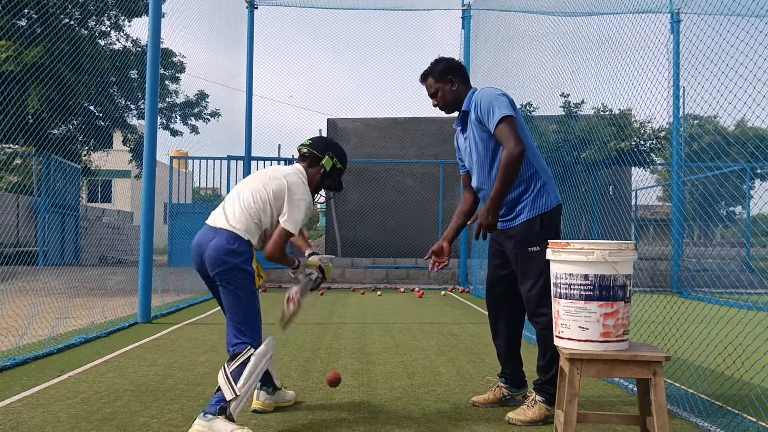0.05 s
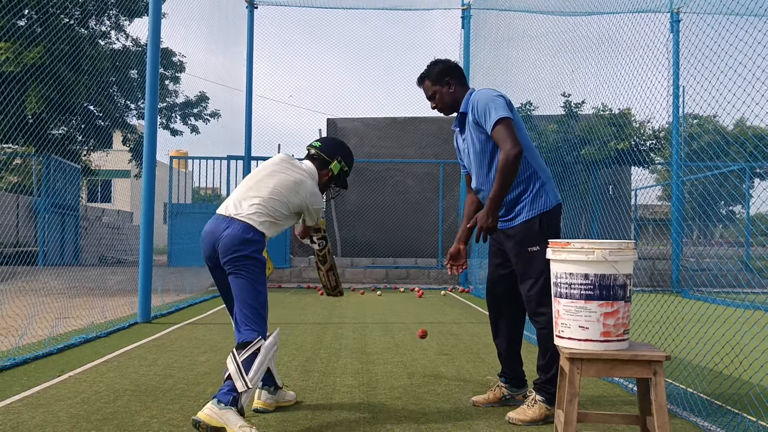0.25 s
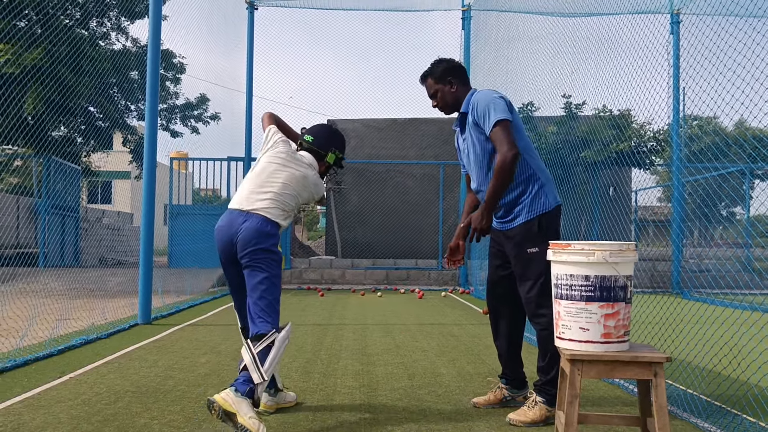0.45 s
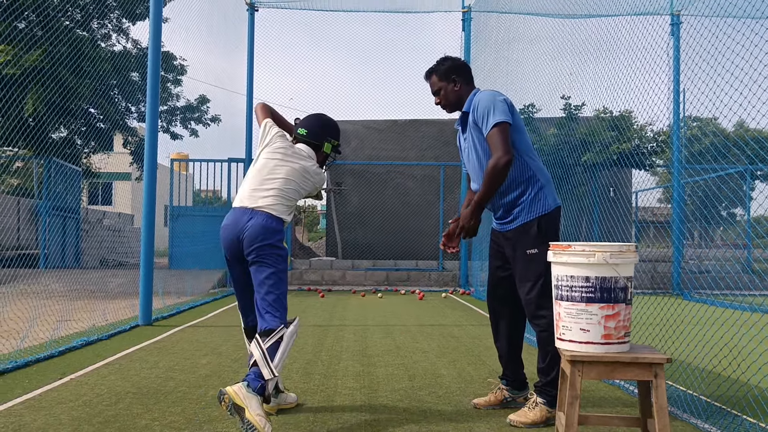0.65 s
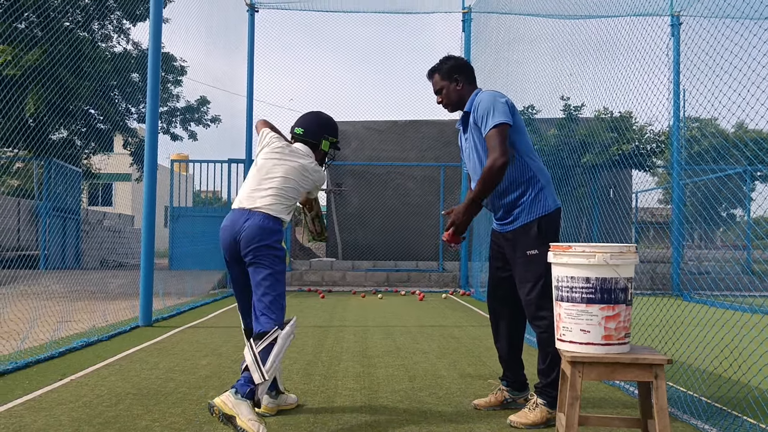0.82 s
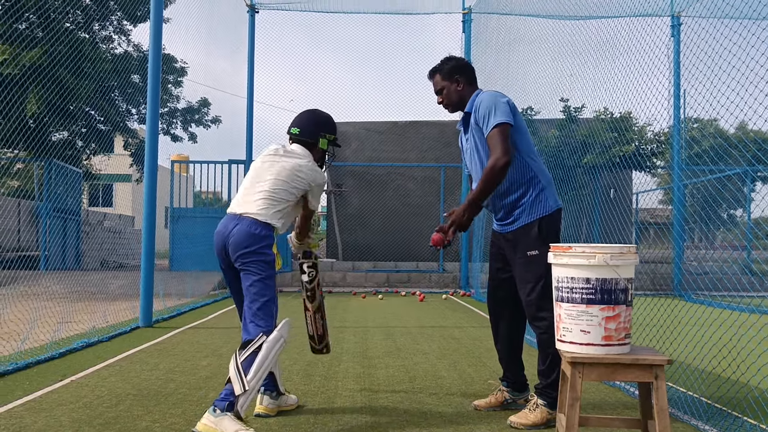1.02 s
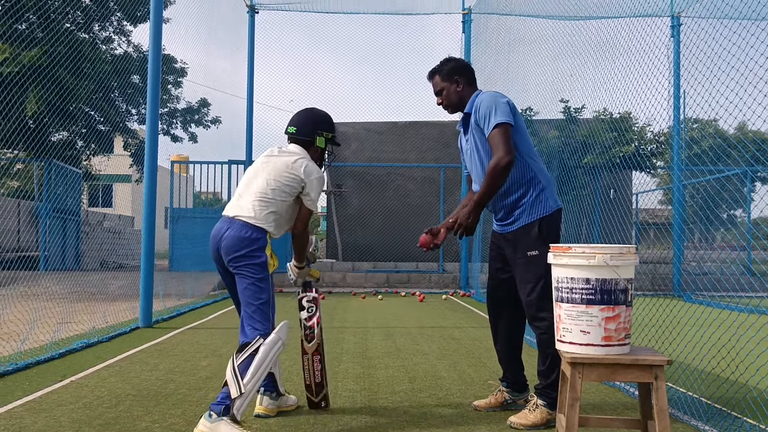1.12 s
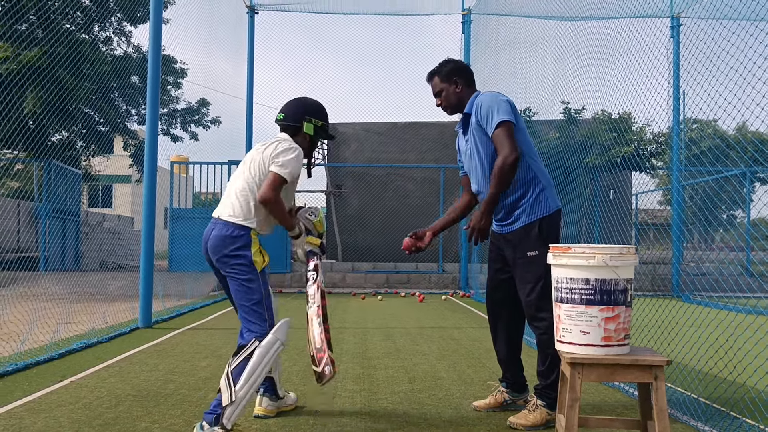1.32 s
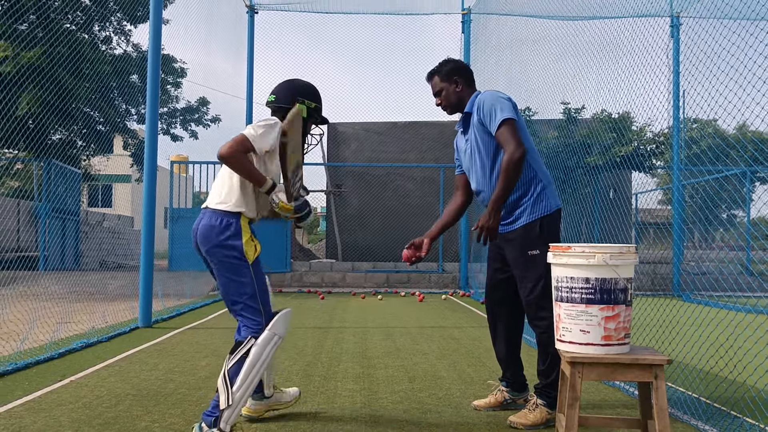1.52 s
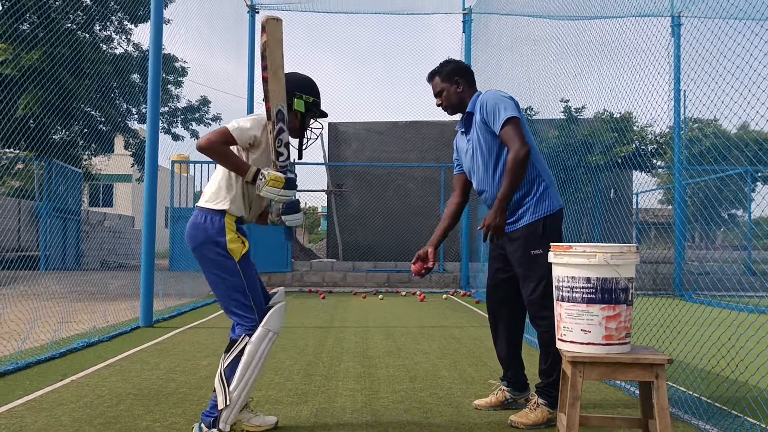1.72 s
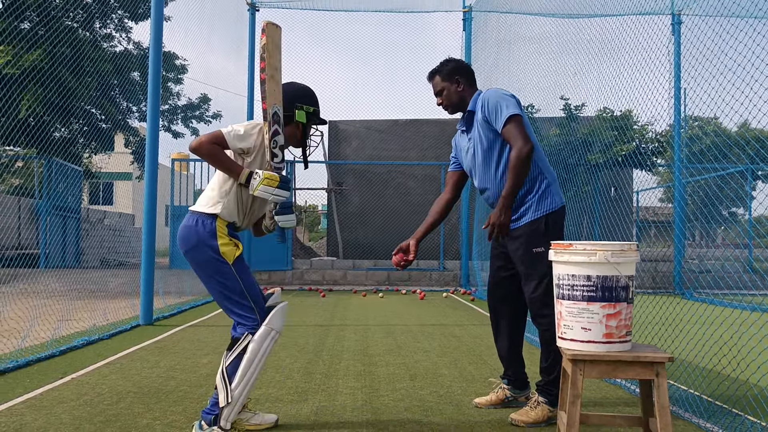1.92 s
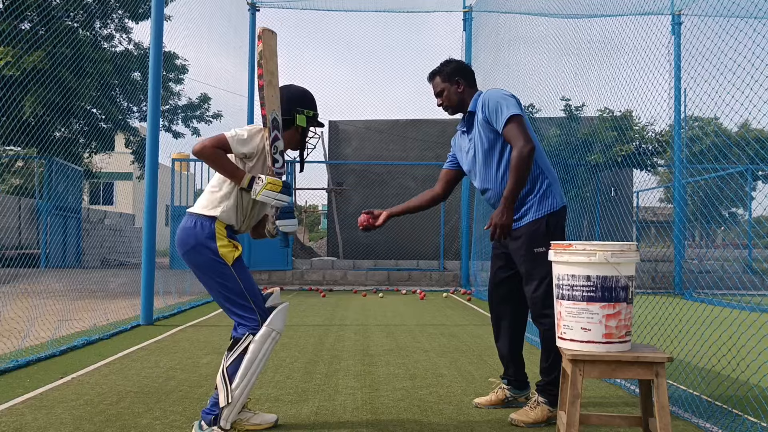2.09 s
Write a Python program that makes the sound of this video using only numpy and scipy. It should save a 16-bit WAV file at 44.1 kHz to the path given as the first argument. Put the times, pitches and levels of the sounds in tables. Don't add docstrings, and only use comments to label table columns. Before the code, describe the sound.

A cricket bat cracks hard against a ball once, echoing off walls around an outdoor net

```python
import sys
import numpy as np
from scipy import signal
from scipy.io import wavfile

SR = 44100
rng = np.random.default_rng(int(sys.argv[2]) if len(sys.argv) > 2 else 0)


def store_pcm(level_fs):
    pcm = np.round(np.clip(level_fs, -1, 1) * 32767).astype(np.int16)
    wavfile.write(sys.argv[1], SR, np.atleast_2d(pcm).T)


def how_loud(loudness_db):
    steps = np.asarray(loudness_db, float) / 20
    return 10 ** steps


N = 94815

# (time [s], peak level [dB], brightness [dB], ground lag [s], left lead [s])
BLOW = (.2131, -1, 1, .0025, 0)
SLAP = (.2476, -2.5, -4, .0022, .00018)
# (time [s], peak level [dB], pan [dB])
FAR_WALLS = [(0.28, -23, 1.0), (0.289, -22, 0.5), (0.303, -29, 0.5), (0.314, -34, 1.5), (0.325, -34, 1.0),
             (0.34, -35, 0.5), (0.361, -38, 1.0), (0.374, -31, -0.5), (0.385, -36, 0.0), (0.396, -34, 1.5),
             (0.409, -29, 2.0), (0.43, -41, 2.5), (0.451, -46, 1.5), (0.465, -51, -1.5), (0.483, -52, -1.0),
             (0.506, -48, -4.0), (0.541, -53, -2.5)]
# (frequency [Hz], level [dB], t60 [s])
BLADE_MODES = [(242.6, -6.5, 0.012), (410, -7.5, 0.0096), (730, -2, 0.0105), (900, -6.5, 0.011)]
FACE_MODES = [(2280, -19, .013), (3200, -14, .005), (4100, -17, .005), (5200, -23, .007), (5800, -27, .007),
              (6500, -30, .007), (7400, -33, .007), (13000, -24, .006)]
WALL_MODES = [(380, -9, .011), (775, -1, .015), (950, -9, .01), (1410, -6, .01)]
YARD_MODES = [(316.2, -16, 0.013), (561.6, 4.5, 0.0085), (760, 6, 0.011), (950, -9, 0.045),
              (1400, -16, .045)]
# (time [s], level [dB])
SCATTER = [(.217, -60), (.222, -49.5), (.245, -44), (.254, -32), (.3, -42), (.35, -48.5), (.405, -46.5),
           (.47, -58), (.55, -68), (.6, -130)]
# (time [s], rise [s], t60 [s], level [dB], pan [dB])
BOUNCE = [
    (.161, .002, .022, -47, 0),
    (.163, .004, .09, -62, 0),
]
NET = [
    (.208, .006, .06, -48, 1),
    (.2345, .001, .02, -50, 3),
    (.247, .003, .08, -49, 1),
    (.258, .03, .14, -50, 1),
]
SHOE = [(.08, 0.0037, 0.42, -77.5, 11.5), (.627, 0.0031, 0.39, -66.5, 6.5), (.69, 0.031, .3, -71.5, 10.5),
        (.89, 0.099, .2, -84, 12.5), (1.53, 0.032, 0.3, -83, 5.5), (1.3, 0.018, 0.13, -78.5, 7)]
SLEEVE = [
    (1.84, 0.085, 0.3, -67, 1),
    (2.02, 0.022, 0.21, -73.5, 0),
]
PAD = [
    (1.207, 0.0061, 0.074, -35, 1),
    (1.221, 0.0015, 0.15, -53, 1),
]
# (frequency [Hz], width [Hz], level [dB])
BOUNCE_TONE = [(300, 200, -14), (990, 150, 0), (2290, 600, 5), (3500, 900, -6), (4520, 300, 1),
               (5150, 300, -2), (12000, 4000, -26)]
NET_TONE = [(1900, 710, -1), (3460, 1100, 1), (4495, 2000, 0), (5580, 600, -7), (6700, 1400, -12),
            (12800, 4500, -7)]
SHOE_TONE = [(2800, 1500, -13), (4500, 500, -9), (5400, 600, -6), (6900, 1000, 4), (12500, 3500, -11)]
PAD_TONE = [(157, 97, -27), (1580, 79, -20), (2470, 270, -12.5), (3430, 480, 0.5), (4360, 1800, -7.5),
            (5340, 2300, -5), (6900, 1300, -11), (12500, 6000, -8)]
# (time [s], level [dB])
HORN_LEVEL = [(0, -72), (.14, -68.5), (.36, -71.5), (.4, -96), (1.1, -90), (1.15, -61), (1.3, -63),
              (1.38, -58), (1.44, -67), (1.53, -63), (1.65, -75), (1.78, -60), (1.93, -57), (2.06, -66.5),
              (2.15, -91)]
# (multiple of fundamental [-], level [dB], share of the level swing [-])
HORN_PARTIALS = [(9, -3, 1.7), (10, 1.5, 1), (11, -5, 1.5), (15, -26, 1.2)]
# (time [s], length [s], pitch [Hz], level [dB], waver share [-])
HOOTS = [(.79, .07, 670, -62, .015), (.87, .09, 685, -71, .01), (1.14, .12, 760, -61, .012),
         (1.22, .15, 800, -70, .015), (.96, .09, 1090, -73, .015), (.99, .09, 1280, -74, .02),
         (1.3, .07, 2650, -68, .008), (1.33, .1, 1330, -76, .02), (1.91, .05, 625, -71, .01)]
# (time [s], length [s], start pitch [Hz], end pitch [Hz], level [dB])
GLIDES = [(.07, .04, 7000, 6200, -80), (.085, .1, 5500, 5300, -84), (.41, .11, 1430, 1330, -69),
          (.44, .12, 960, 830, -62), (.445, .045, 3120, 2850, -74), (.53, .08, 3530, 3530, -79),
          (.675, .15, 5750, 5250, -79), (.69, .09, 4500, 4450, -81), (.79, .065, 4420, 4380, -76),
          (.885, .15, 3400, 3240, -68.5), (.93, .09, 5050, 5000, -87), (1.3, .06, 6500, 6500, -80),
          (1.27, .1, 5400, 5250, -78)]
# (time [s], pulse rate [Hz], level [dB], rattle 0-1 [-], upper throat share 0-1 [-])
CAW = [(1.66, 350, -110, 0.5, .1), (1.72, 345, -60, 0, 0.3), (1.745, 335, -49, 1, 0.36),
       (1.8, 315, -47, 0.34, 0), (1.85, 310, -45.5, .8, .8), (1.93, 303, -45.5, 1, 1),
       (1.98, 300, -52.5, 0.6, 0.76), (2.01, 295, -60.5, .4, 0.7), (2.14, 295, -75, .4, .9)]
# (frequency [Hz], width [Hz], level [dB])
THROAT_LOW = [(1343, 110, 0), (1409, 200, -1.5), (1830, 100, -4.5)]
THROAT_HIGH = [(1598, 114, 5), (2400, 110, -11), (2780, 210, -14.5)]
# (frequency [Hz], density [dB per Hz])
TOWN_SPECTRUM = [(20, -32.5), (90, -0.5), (300, -7), (900, -18.5), (3300, -15), (4300, -27.5),
                 (6800, -32.5), (8000, -48.5)]
# (frequency [Hz], likeness [-])
LIKENESS = [(60, 0.96), (300, .85), (1000, .4), (4000, 0.13), (12000, .6)]

CONTACT_HZ, SLAP_CUT_HZ = 1250, 2200
THIN_HZ, YARD_THIN_HZ = 210, 443
TURF_DB, TURF_FACE_DB = -5.5, -2
PORT_SPREAD = 0.12
FACE_LAG_S, FAR_LAG_S = 0.0002, 0.0012
FAR_DB = 1
SCATTER_PER_S, SCATTER_SPREAD_DB = 2000, 2.0
HORN_HZ = 353.5
TOWN_DB, HUM_DB, HUM_HZ, HUM_WIDTH_HZ = -66.5, -72, 91, 30
HISS_DB = -96
RIGHT_PORT_HZ, CUTOFF_HZ = 9100, 16900
DIP_HZ, DIP_WIDTH_HZ, DIP_SHARE = 8600, 2000, 0.6


def rms_one(x):
    return x / np.sqrt(np.mean(x ** 2) + 1e-20)


def butter(x, order, hz, kind="low"):
    return signal.sosfilt(signal.butter(order, hz, kind, fs=SR, output="sos"), x)


def in_time(rows):
    s, *columns = np.transpose(rows)
    return [np.interp(np.arange(N) / SR, s, c) for c in columns]


def at_hz(points, hz):
    table_hz, value = np.transpose(points)
    return np.interp(np.log(hz), np.log(table_hz), value)


def pan(db):
    return how_loud(np.array([[db / 2], [-db / 2]]))


def drift(rate_hz):
    r = np.exp(-2 * np.pi * rate_hz * 40 / SR)
    white = rng.standard_normal(N // 40 + 2002)
    slow = signal.lfilter([1], [1, -2 * r, r * r], white)[2000:]
    return np.interp(np.arange(N) / 40, np.arange(len(slow)), rms_one(slow))


def ring(clicks, modes):
    out = 0
    for hz, db, t60_s in modes:
        r = how_loud(-60 / (t60_s * SR))
        w = 2 * np.pi * hz / SR
        mode = signal.lfilter([0, np.sin(w)], [1, -2 * r * np.cos(w), r * r], clicks + 1e-18)
        out = out + how_loud(db) * mode
    return out


def resonance(x, hz, width_hz):
    r = np.exp(-np.pi * width_hz / SR)
    b = np.array([1, 0, -1]) * (1 - r * r) / 2
    return signal.lfilter(b, [1, -2 * r * np.cos(2 * np.pi * hz / SR), r * r], x)


def resonance_twice(x, hz, width_hz):
    return resonance(resonance(x, hz, width_hz), hz, width_hz)


def bat():
    near = strike(BLOW, 1, BLADE_MODES, CONTACT_HZ) + strike(SLAP, -1, WALL_MODES, SLAP_CUT_HZ)
    return butter(near + far_walls() + yard_scatter(), 3, THIN_HZ, "high")


def strike(blow, sign, modes, cut_hz):
    s, db, bright_db, lag_s, lead_s = blow
    direct, turf = np.zeros((2, 2, N))
    for side, at in enumerate((s, s + lead_s)):
        direct[side, int(at * SR)] = sign * how_loud(db)
        turf[side, int((at + lag_s) * SR)] = sign * how_loud(db + TURF_DB)
    blade = how_loud(-4.5) * ring(direct + turf, modes)
    unlike = [np.convolve(v, np.r_[1, PORT_SPREAD * rng.standard_normal(12)])[:N] for v in direct]
    face = ring(np.array(unlike), FACE_MODES) + how_loud(TURF_FACE_DB) * ring(turf, FACE_MODES[:1])
    face = butter(how_loud(bright_db) * face, 2, [1900, 6000], "band")
    face = np.roll(face, int(FACE_LAG_S * SR), axis=1)
    return butter(blade, 4, cut_hz) + face


def far_walls():
    clicks = np.zeros((2, N))
    for s, db, pan_db in FAR_WALLS:
        clicks[:, int((s + FAR_LAG_S) * SR)] = -how_loud(db + FAR_DB) * pan(pan_db)[:, 0]
    return butter(ring(clicks, WALL_MODES[:3]), 2, [280, 1200], "band")


def yard_scatter():
    level_db, = in_time(SCATTER)
    hits = (rng.random(N) < SCATTER_PER_S / SR) * rng.standard_normal(N)
    hits = hits * how_loud(SCATTER_SPREAD_DB * rng.exponential(1, N).clip(0, 4))
    hits = hits * how_loud(2.2 * rng.standard_normal(N) * [[1], [-1]])
    colored = rms_one(butter(ring(hits, YARD_MODES), 2, [YARD_THIN_HZ, 1700], "band"))
    begun = np.arange(N) > SCATTER[0][0] * SR
    return how_loud(level_db) * begun * colored


def scuffs(events, tone, patchy_db):
    t, envelope, rub = np.arange(N) / SR, 0, 0
    for s, rise_s, t60_s, db, pan_db in events:
        swell = np.clip((t - s) / rise_s, 0, 1) ** 2
        decay_db = 60 * np.maximum(t - s - rise_s, 0) / t60_s
        envelope = envelope + pan(pan_db) * swell * how_loud(db - decay_db)
    for hz, width_hz, db in tone:
        mid, side = rng.standard_normal((2, N))
        noise = mid + 0.15 * side * [[1], [-1]]
        grain = how_loud(db + patchy_db * drift(170))
        rub = rub + grain * rms_one(resonance_twice(noise, hz, width_hz))
    return envelope * rub


def rubbing():
    ball = scuffs(BOUNCE, BOUNCE_TONE, patchy_db=3.5) + scuffs(NET, NET_TONE, patchy_db=6)
    sleeve = scuffs(SLEEVE, NET_TONE[:4], patchy_db=2.5)
    shoe = scuffs(SHOE, SHOE_TONE, patchy_db=2.5)
    return ball + sleeve + shoe + scuffs(PAD, PAD_TONE, patchy_db=4)


def horn():
    level_db, = in_time(HORN_LEVEL)
    turn = 2 * np.pi * np.cumsum(HORN_HZ * (1 + 0.0034 * drift(18))) / SR
    out = np.zeros((2, N))
    for side in range(2):
        for multiple, db, swing in HORN_PARTIALS:
            partial_db = swing * (level_db + 60) - 60 + db + 4 * drift(45)
            out[side] += how_loud(partial_db) * np.sin(multiple * turn + 1.5 * drift(8))
    return np.sqrt(2) * out


def crow():
    hz, db, rattle, upper = in_time(CAW)
    turns = np.cumsum(hz * (1 + 0.012 * drift(40))) / SR
    pulses = np.diff(np.floor(turns), prepend=0)
    pulses = pulses * (1 + 1.5 * rattle * np.cos(2 * np.pi * turns / 3))
    pulses = pulses * how_loud(1.2 * rng.standard_normal(N))
    breath = 0.02 * rng.standard_normal(N)
    source = butter(pulses + breath, 4, 1100, "high")
    low, high = [rms_one(sum(how_loud(g) * resonance_twice(source, f, w) for f, w, g in throat))
                 for throat in (THROAT_LOW, THROAT_HIGH)]
    upper = np.clip(upper, 0, 1)
    voice = how_loud(db) * (np.sqrt(1 - upper) * low + np.sqrt(upper) * high)
    left = voice + 0.72 * np.roll(voice, int(0.019 * SR))
    right = np.roll(voice, int(0.00018 * SR)) - 0.42 * np.roll(voice, int(0.024 * SR))
    return np.array([left, right]) * pan(1.2)


def hoots():
    t, out = np.arange(N) / SR, 0
    for s, length_s, hz, db, waver in HOOTS:
        shape = np.sin(np.pi * np.clip((t - s) / length_s, 0, 1) ** 0.76)
        phase = 2 * np.pi * np.cumsum(hz * (1 + waver * drift(25))) / SR
        phase = phase + 1.54 * drift(8) * [[1], [-1]]
        out = out + how_loud(db + 7.5 + 2 * drift(45)) * shape * np.sin(phase)
    return out


def glides():
    t, out = np.arange(N) / SR, 0
    for s, length_s, from_hz, to_hz, db in GLIDES:
        share = np.clip((t - s) / length_s, 0, 1)
        hz = (from_hz + (to_hz - from_hz) * share) * (1 + 0.008 * drift(60))
        phase = 2 * np.pi * np.cumsum(hz) / SR + 1.2 * drift(8) * [[1], [-1]]
        shape = np.sqrt(np.abs(np.sin(np.pi * share))) * (share < 1)
        out = out + how_loud(db + 6 + 4 * drift(50)) * shape * np.sin(phase)
    return out


def traffic(patchy_db, rate_hz):
    out, together = 0, drift(rate_hz)
    edges = 25 * 2 ** np.arange(0, 9.6, 0.5)
    white = rng.standard_normal((2, 2, N))
    for k, (low, high) in enumerate(zip(edges, edges[1:])):
        hz = np.sqrt(low * high)
        mid, side = butter(white[k % 2], 2, [low, high], "band")
        alike = at_hz(LIKENESS, hz)
        gain = how_loud(at_hz(TOWN_SPECTRUM, hz) + patchy_db * (0.6 * together + drift(rate_hz)))
        out = out + gain * (np.sqrt(1 + alike) * mid + np.sqrt(1 - alike) * side * [[1], [-1]])
    return rms_one(out)


def town():
    drone = rms_one(resonance_twice(rng.standard_normal(N), HUM_HZ, HUM_WIDTH_HZ))
    return how_loud(TOWN_DB) * traffic(patchy_db=1.8, rate_hz=12) + how_loud(HUM_DB) * drone


def scene():
    return bat() + rubbing() + horn() + crow() + hoots() + glides() + town()


def roll_off(x):
    return signal.sosfilt(signal.butter(12, 16460, fs=SR, output="sos"), x)


def record(dry):
    hiss = how_loud(HISS_DB) * rms_one(resonance(rng.standard_normal(N), 12500, 5000))
    ports = np.array([dry[0] + hiss, butter(dry[1], 7, RIGHT_PORT_HZ)])
    ports = ports - DIP_SHARE * resonance(ports, DIP_HZ, DIP_WIDTH_HZ)
    mix = signal.sosfilt(signal.cheby2(12, 60, CUTOFF_HZ, fs=SR, output="sos"), ports)
    return roll_off(mix)


dry = scene()
out = record(dry)
store_pcm(out)
```